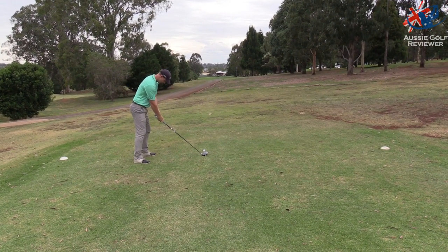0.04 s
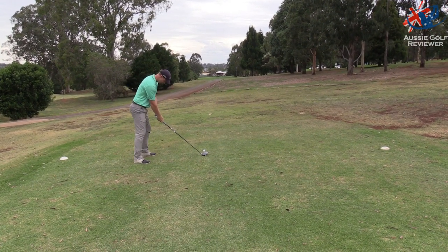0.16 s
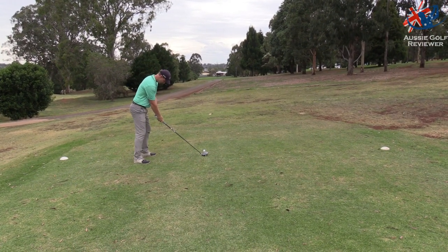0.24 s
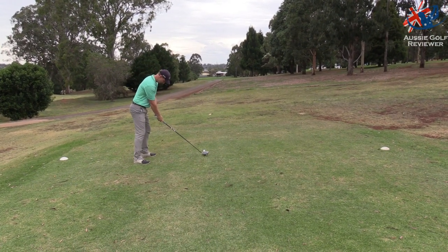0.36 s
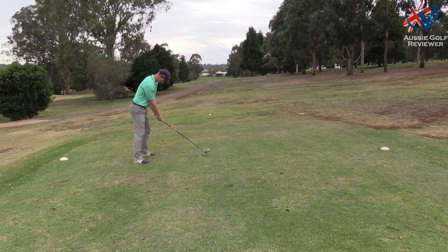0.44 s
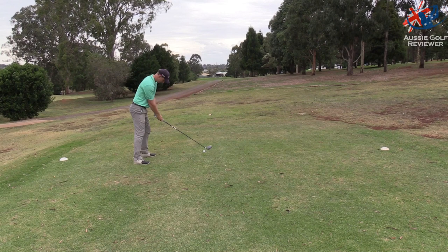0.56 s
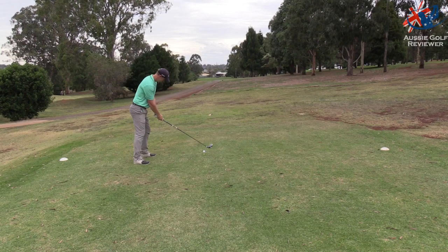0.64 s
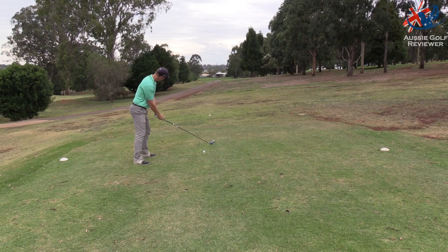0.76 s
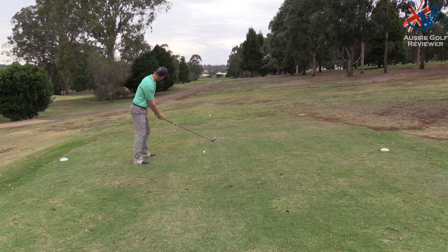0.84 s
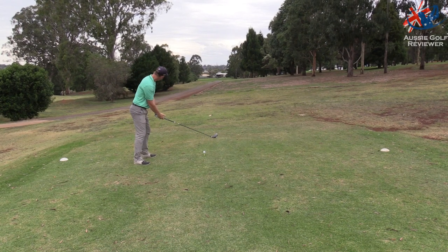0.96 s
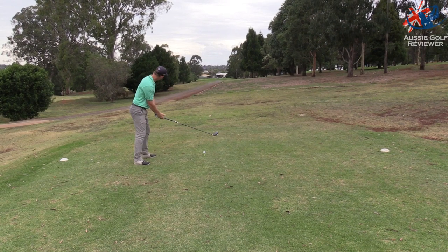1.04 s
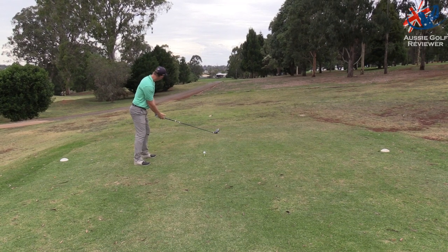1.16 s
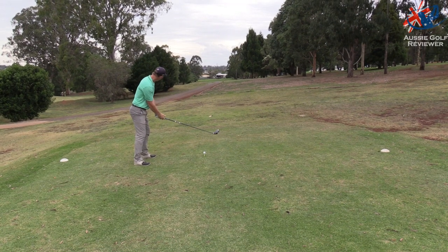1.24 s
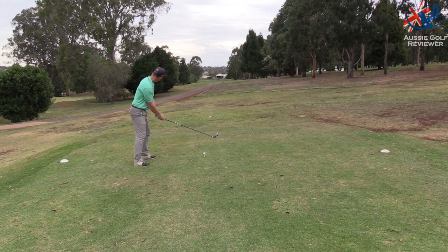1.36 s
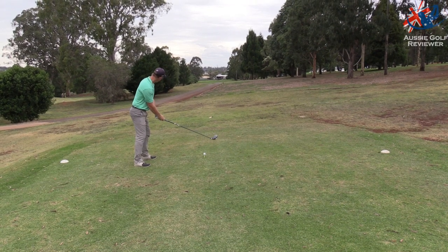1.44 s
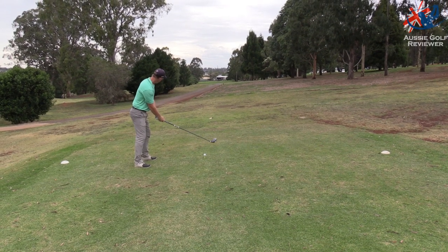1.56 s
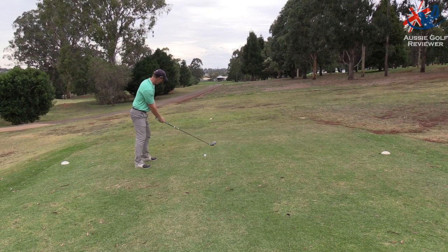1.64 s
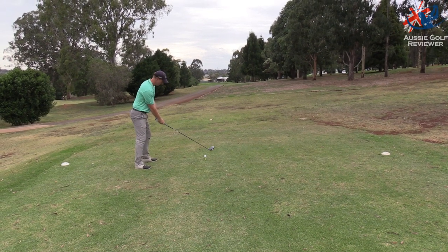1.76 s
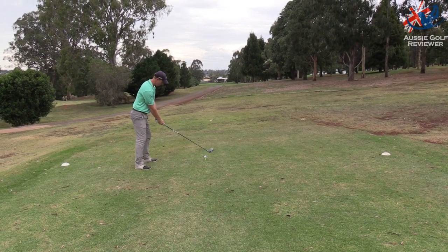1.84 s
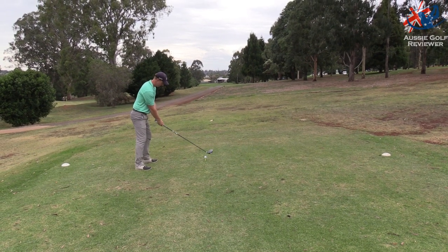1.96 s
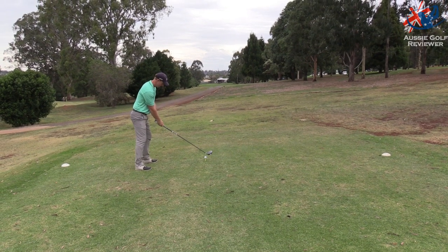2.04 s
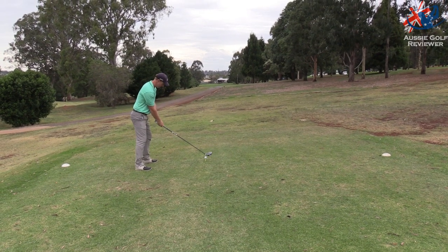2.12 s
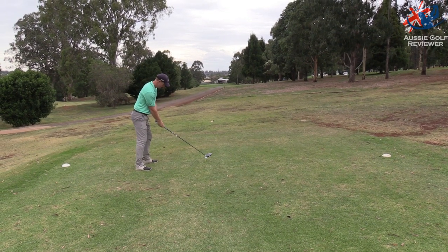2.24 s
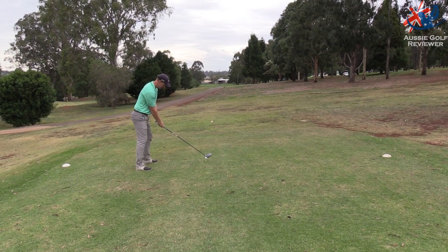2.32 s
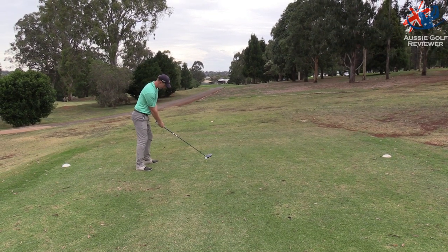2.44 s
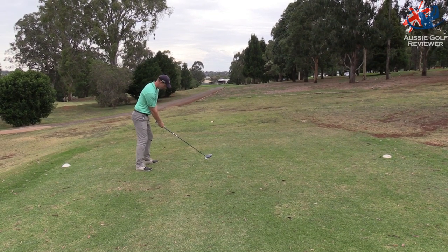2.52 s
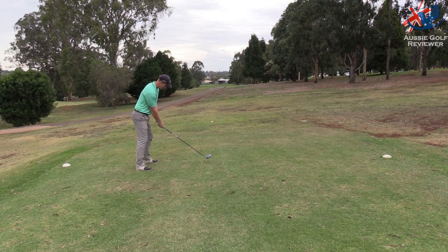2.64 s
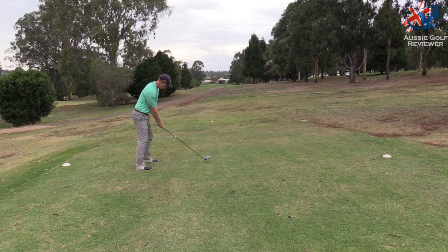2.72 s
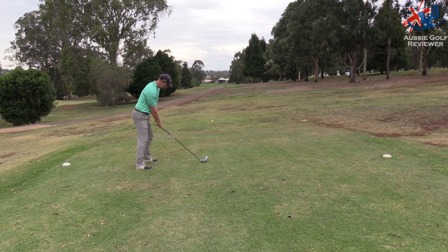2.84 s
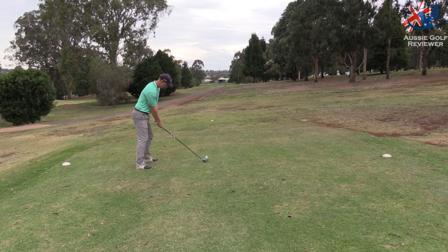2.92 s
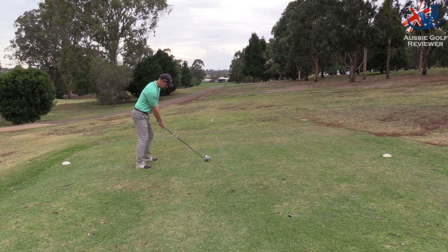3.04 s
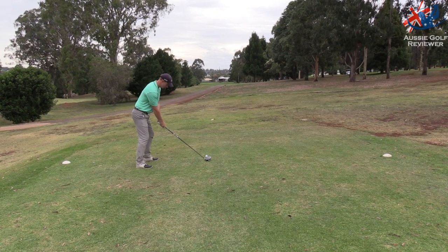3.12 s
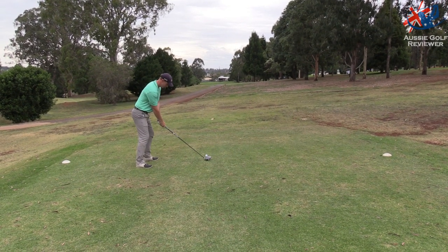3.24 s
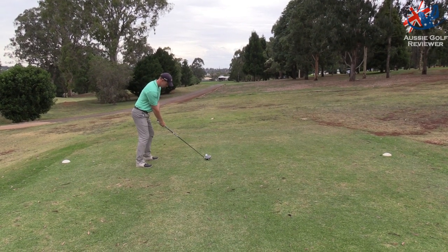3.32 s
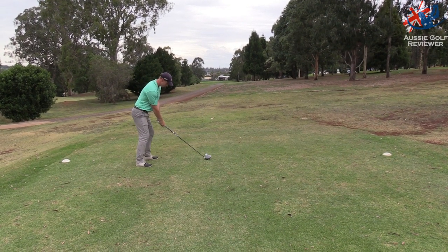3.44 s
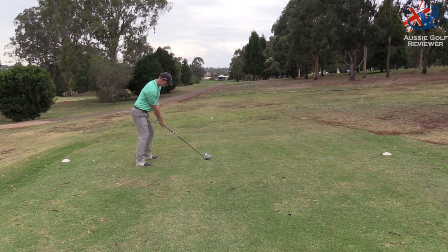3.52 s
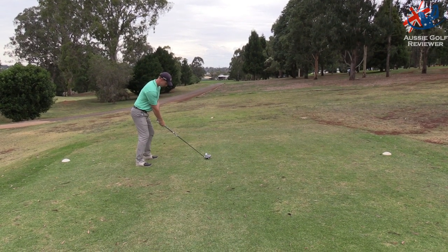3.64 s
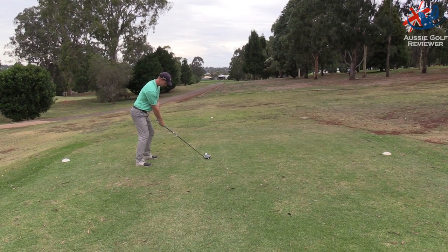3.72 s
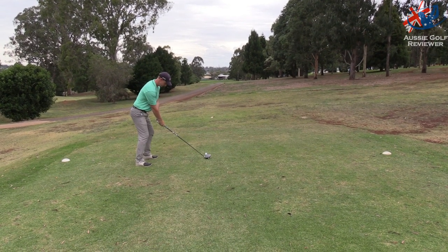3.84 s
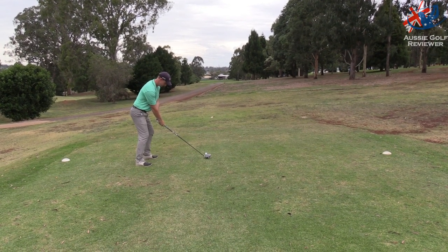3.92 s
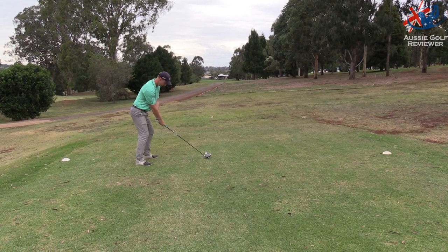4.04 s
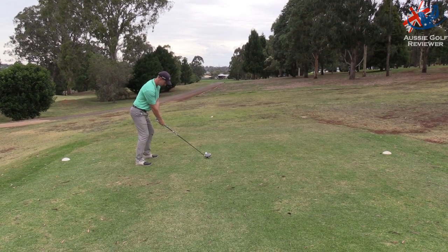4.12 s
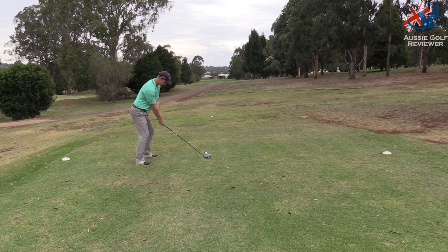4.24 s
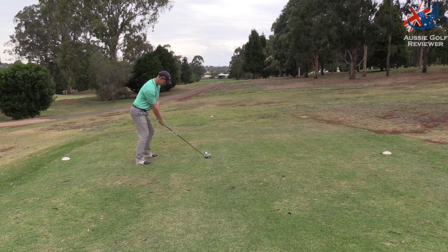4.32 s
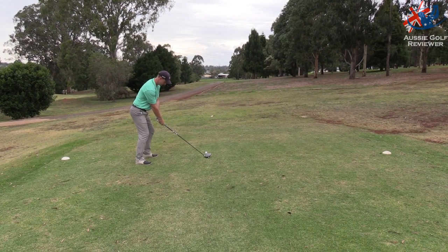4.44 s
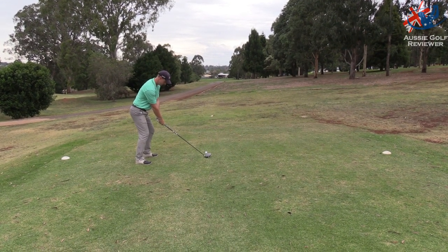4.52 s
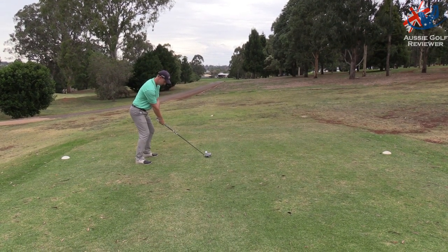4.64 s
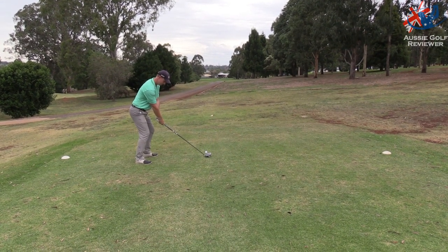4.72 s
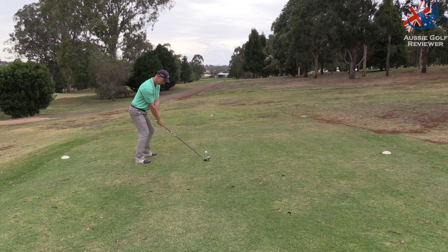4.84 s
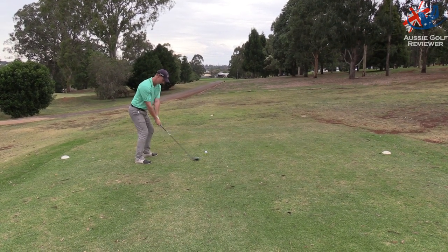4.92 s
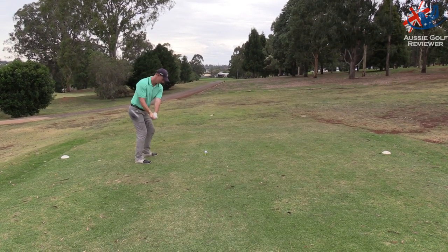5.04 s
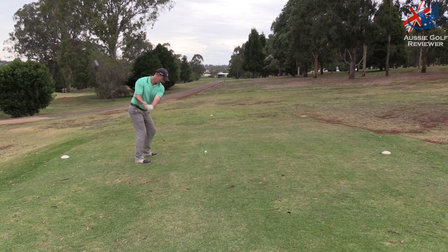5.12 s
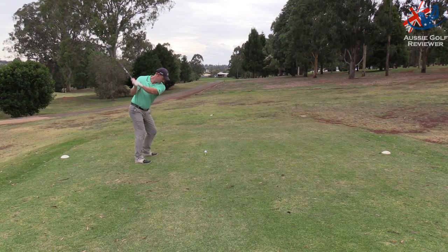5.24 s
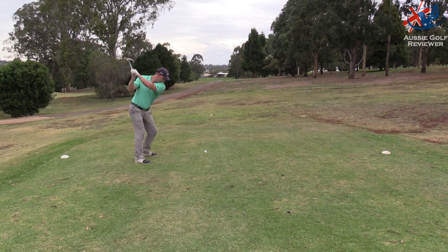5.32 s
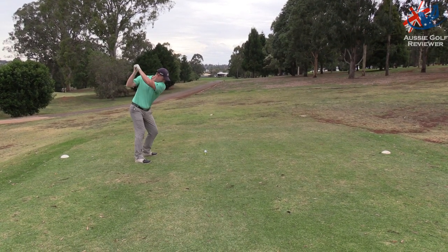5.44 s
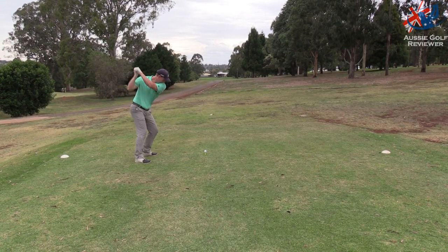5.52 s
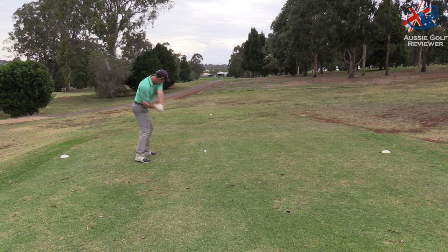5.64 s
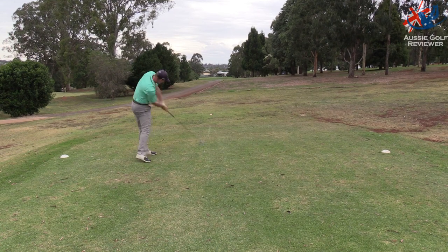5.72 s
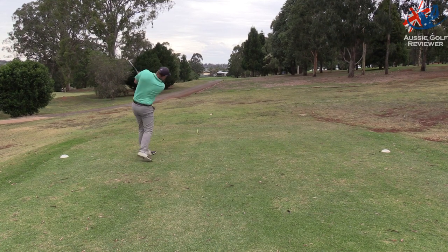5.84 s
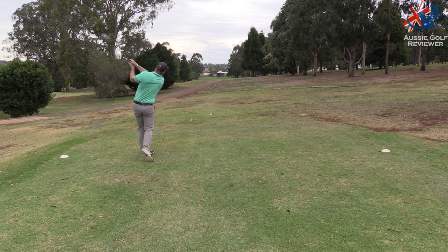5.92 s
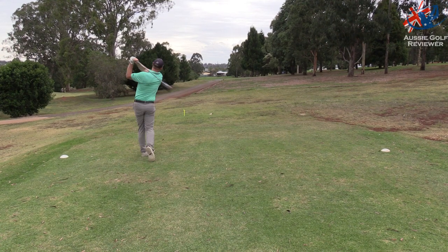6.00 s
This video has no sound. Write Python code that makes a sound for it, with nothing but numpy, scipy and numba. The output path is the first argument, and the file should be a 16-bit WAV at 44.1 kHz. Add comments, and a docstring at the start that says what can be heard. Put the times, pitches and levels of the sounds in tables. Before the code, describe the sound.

Quiet breezy outdoors with faint wind rumble, leaf hiss and distant bird chirps, then a quick swish and one loud, sharp metallic golf drive.

```python
"""Tee shot on a breezy tree-lined course

A driver strikes a ball a few metres from the microphone: band-passed noise makes the shaft's swish,
a pressure pulse, noise and decaying modes make the crack and ring, and turf and tree lines echo them.
Noise bands make wind and leaf hiss; gliding sines make small birds far off and one thin tone after
the strike. Short noise bursts tick close by."""
import sys
import numpy as np
from scipy import signal
from scipy.io import wavfile
from scipy.ndimage import uniform_filter1d, map_coordinates
from numba import njit

SR = 44100
rng = np.random.default_rng(int(sys.argv[2]) if len(sys.argv) > 2 else 0)


def to_wav(sig):
    """Store sig (one row per channel, or 1-D mono) as 16-bit WAV at the path in sys.argv[1].

    Samples outside -1..1 are clipped; the rate is SR.
    """
    pcm = np.clip(np.atleast_2d(sig), -1, 1) * 32767
    pcm = np.round(pcm).astype(np.int16)
    wavfile.write(sys.argv[1], SR, pcm.T)  # frames by channels


N = 267642


def undb(db):
    """Amplitude factor of a level in dB."""
    return 10 ** (np.asarray(db) / 20)


def unit(x):
    """The signal scaled to rms 1."""
    return x / np.sqrt(np.mean(x ** 2))


def curves(rows):
    """Columns of a table as signals over the whole scene; the first column is time."""
    s, *columns = np.transpose(rows)
    return [np.interp(np.arange(N) / SR, s, column) for column in columns]


def on_log(table, hz):
    """Level read from a spectrum table, straight between points on a log frequency axis."""
    table_hz, table_db = np.transpose(table)
    return np.interp(np.log(hz), np.log(table_hz), table_db)


@njit
def svf(x, hz, sharp):
    """State-variable band-pass with a moving centre, gain 1 there."""
    y, b, l = np.empty(len(x)), 0., 0.
    for i in range(len(x)):
        g = np.tan(np.pi * hz[i] / SR)
        v = (b + g * (x[i] - l)) / (1 + g * (g + 1 / sharp))
        b, l, y[i] = 2 * v - b, l + 2 * g * v, v / sharp
    return y


def band(hz, edge):
    """Noise between hz / edge and hz * edge, rms 1."""
    edges_hz = [hz / edge, min(hz * edge, .45 * SR)]
    sos = signal.butter(2, edges_hz, "band", fs=SR, output="sos")
    return unit(signal.sosfilt(sos, rng.standard_normal(N)))


def around(x, hz, span):
    """Gentle band-pass from hz / span to hz * span."""
    edges_hz = [hz / span, min(hz * span, .45 * SR)]
    return signal.sosfilt(signal.butter(1, edges_hz, "band", fs=SR, output="sos"), x)


def walk(rate):
    """Random levels held 1 / rate s and slewed twice; spread near 1."""
    hold = int(SR / rate)
    steps = np.repeat(rng.standard_normal(N // hold + 1), hold)
    return unit(uniform_filter1d(uniform_filter1d(steps, hold), hold)[:N])


def spread(mid, side):
    """Left and right channels from mid and side."""
    return np.array([mid + side, mid - side])


def add(out, s, sound):
    """Mix a sound in at time s."""
    i = int(s * SR)
    out[..., i:i + sound.shape[-1]] += sound[..., :N - i]


def texture(table, start_hz, count, moves_db):
    """Half-octave stereo noise bands sharing unit mid power; moves_db(hz) is each band's changing level."""
    # stereo width of the outdoor air: hz, side_minus_mid_db
    width = [(30, -17), (60, -13), (110, -21.5), (200, -8.5), (380, -15), (700, -13), (1290, -10),
             (2380, -7), (4400, -16), (8120, -16.5), (15000, 3)]
    centres_hz = start_hz * 2 ** (np.arange(count) / 2)
    # a wider band holds more power
    shares = undb(on_log(table, centres_hz)) * np.sqrt(centres_hz)
    shares /= np.linalg.norm(shares)
    out = np.zeros((2, N))
    for hz, share in zip(centres_hz, shares):
        side = undb(on_log(width, hz)) * band(hz, 1.25)
        out += share * undb(moves_db(hz)) * spread(band(hz, 1.2272), side)
    return out


def wind():
    """Turbulence on the capsule; stronger gusts reach higher, eddies thump."""
    # wind at the microphone: start_s, level_db
    gusts = [(0, -53), (.5, -57), (1.1, -51), (1.5, -54), (1.7, -57), (2.42, -57.5), (2.62, -50),
             (2.8, -53.5), (3.33, -51.5), (3.9, -54.5), (4.56, -51.5), (4.64, -44), (4.82, -46),
             (4.9, -48.5), (5.1, -49), (5.5, -50), (5.75, -45), (5.82, -44), (5.93, -46), (6.07, -46)]
    # buffeting spectrum: hz, relative_db_per_hz
    buffet = [(12, -42), (20, -16), (43, -13), (73, -1.5), (123, -3.5), (242, -11.5), (398, -18.5),
              (500, -22), (650, -53), (1100, -120)]
    # lone eddies that thump the capsule: start_s, peak_db, pitch_hz
    thumps = [(1.19, -47, 80.3), (1.93, -44, 99.4), (2.908, -39.5, 110.4), (3.51, -47, 80.5),
              (3.675, -47, 84.7), (4.333, -44.5, 142.5), (4.643, -41.5, 104), (4.674, -35.5, 132.7),
              (4.81, -31.5, 146), (5.156, -41, 327), (5.166, -36.5, 221), (5.174, -34.5, 101),
              (5.242, -38, 187), (5.349, -40.5, 110.4), (5.576, -32.5, 115.2), (5.662, -32.5, 118),
              (5.815, -37.5, 94.8), (5.924, -31.5, 118.3), (5.952, -34.5, 99), (5.979, -41, 152.7),
              (6.043, -46.5, 111)]
    gust_db, = curves(gusts)
    below_peak_db = gust_db - gust_db.max()

    def moves_db(hz):
        octaves_up = max(np.log2(hz / 130), 0)
        return gust_db + 0.75 * below_peak_db * octaves_up + 2.67 * walk(18)

    out = texture(buffet, 23.54, count=9, moves_db=moves_db)
    for s, db, hz in thumps:
        t = np.arange(int(2.48 * SR / hz)) / SR  # 2.48 cycles
        add(out, s, undb(db) * np.hanning(len(t)) * np.sin(2 * np.pi * hz * t))
    return out


def leaves():
    """Far foliage hiss that swells slowly and flickers a little."""
    # foliage spectrum: hz, relative_db_per_hz
    foliage = [(150, -0.5), (175, -3.5), (221, -8), (337, -9), (728, -7.5), (1000, -12), (1400, -15),
               (2000, -21), (2810, -22), (3890, -26), (5950, -26.5), (11700, -44.5), (15000, -71.5)]
    # rustle of the trees: start_s, level_db
    rustle = [(0, -60), (1.6, -61), (3.6, -61.5), (4.6, -60.5), (5.6, -60)]
    rustle_db, = curves(rustle)
    return texture(foliage, 169.5, count=14,
                   moves_db=lambda hz: rustle_db + 0.866 * walk(1.629) + 1.21 * walk(12))


def note(hz, db, octave_db):
    """One whistled note with a slight rasp; the octave leads, the low tone follows."""
    waver, rasp = .006, .38  # relative rms spread of pitch and of amplitude
    along = np.linspace(0, 1, len(hz))
    pitch = 1 + waver * unit(uniform_filter1d(rng.standard_normal(len(hz)), 150))
    roughness = 1 + rasp * unit(uniform_filter1d(rng.standard_normal(len(hz)), 120))
    phase = 2 * np.pi * np.cumsum(hz * pitch) / SR
    low = undb(db - 9.9 * (1 - along) ** 2) * np.sin(phase)
    octave = undb(octave_db - 6 * (1 - along) ** 4 - 4.4 * along ** 4) * np.sin(2 * phase)
    return roughness * signal.windows.tukey(len(hz), .25) * np.sqrt(2) * (low + octave)


def birds():
    """Chirps, peeps and a faint far twitter as gliding whistles, smeared by the trees."""
    # rising chirps: start_s, length_s, start_hz, end_hz, bend (over 1 steepens toward the end),
    # level_db, octave_db
    chirps = [(0.045, 0.0447, 2190, 3395, 1.96, -66, -67), (0.2, 0.0383, 2377, 3150, 0.95, -68.5, -75.5),
              (0.473, 0.016, 2352, 3290, 2.1, -67, -81.5), (0.587, 0.0528, 2000, 3118, 2, -68.5, -69.5),
              (1.118, 0.0224, 2900, 3198, 1.2, -69, -78.5), (1.193, 0.05, 2239, 3350, 1.13, -70, -71),
              (1.789, 0.0305, 2295, 3326, 1.25, -68, -70.5), (2.392, 0.0388, 2108, 3130, 1.65, -67, -67.5),
              (3.006, 0.036, 2130, 3008, 1.37, -68, -70), (3.042, 0.0238, 4100, 4636, 0.56, -67.5, -88),
              (3.511, 0.0524, 2100, 3100, 1.5, -66.5, -69.5), (3.96, 0.04, 2168, 3153, 1.73, -73.5, -85),
              (3.875, 0.065, 3930, 4080, 1.5, -72, -95), (4.35, 0.036, 2700, 3640, 1.2, -67.5, -87.5),
              (4.438, 0.044, 2315, 3430, 1.58, -67.5, -75), (4.798, 0.046, 2450, 3942, 1.11, -65.5, -79),
              (5.205, 0.045, 2900, 3950, 0.798, -64, -76), (5.208, 0.0285, 2285, 2825, 1.28, -68, -68.5)]
    # short, slightly rising peeps of other birds: start_s, level_db, pitch_hz
    peeps = [(0.062, -66, 4450), (.088, -67.5, 4150), (0.095, -68, 4720), (.113, -69, 4750),
             (0.132, -67, 3720), (.148, -74, 2943), (.165, -79.5, 5450), (0.225, -65.5, 3900),
             (0.505, -63, 4220), (.632, -68.5, 4100), (.635, -70.5, 5400), (0.652, -67.5, 3520),
             (.658, -73, 2011), (.66, -73.5, 3250), (1.017, -75, 4600), (1.035, -72.5, 3750),
             (1.056, -77, 3800), (1.088, -74.5, 4400), (1.139, -71, 4520), (1.16, -72, 4576),
             (1.176, -74, 4370), (1.215, -71.5, 5516), (1.264, -71, 4353), (1.794, -66, 4730),
             (2.158, -66.5, 6066), (1.53, -72, 3530), (1.58, -73, 3247), (1.97, -79.5, 4160),
             (2.1, -74.5, 5920), (2.2, -74, 5860), (2.35, -68, 2704), (2.361, -67.5, 4700),
             (2.422, -71, 3760), (3.063, -71, 3480), (3.42, -70.5, 3266), (3.474, -75.5, 5000),
             (3.51, -70, 2700), (3.545, -77, 2596), (4.069, -65.5, 4742), (4.825, -70, 5910),
             (4.845, -69, 4730), (4.865, -75.5, 4920), (4.887, -71, 4310), (4.95, -71.5, 4500),
             (5.04, -71, 4560), (5.06, -71, 5580), (5.188, -69.5, 3560), (5.23, -64.5, 3822)]
    # far flock chatter: start_s, level_db
    twitter = [(0, -80), (.7, -81), (1.3, -82), (2.2, -85), (3.2, -84), (3.7, -81.5), (4.3, -82.5),
               (4.9, -79.5), (5.25, -81), (5.5, -87)]
    # flock's pitch range: low_hz, high_hz
    twitter_range = (2690, 5580)
    peep_s, peep_octave_db = 0.0191, -27.5
    echo_s, echo_db = 0.021, -10  # one trunk's echo

    out = np.zeros(N)
    for s, length, start_hz, end_hz, bend, db, octave_db in chirps:
        along = np.linspace(0, 1, int(length * SR))
        add(out, s, note(start_hz + (end_hz - start_hz) * along ** bend, db, octave_db))
    for s, db, hz in peeps:
        glide_hz = hz * np.linspace(.98, 1.03, int(peep_s * SR))
        add(out, s, note(glide_hz, db, db + peep_octave_db))
    for when, pitch, glide, size, loud in rng.random((480, 5)):
        length = int((0.011 + 0.023 * size) * SR)
        hz = np.interp(pitch, [0, 1], twitter_range) * np.linspace(1, .95 + 0.1529 * glide, length)
        db = np.interp(when * N / SR, *np.transpose(twitter)) + 3.5 * loud ** 3
        add(out, when * (N - 1) / SR, note(hz, db, db + peep_octave_db))

    t = np.arange(int(.25 * SR)) / SR
    # a separate noise tail for each channel, falling 60 dB in 0.156 s
    tails = [undb(-36.5 - 60 * t / 0.156) * rng.standard_normal(len(t)) for _ in range(2)]
    smear = signal.fftconvolve(out[None], tails, axes=1)[:, :N]
    echo = undb(echo_db) * np.roll(out, int(echo_s * SR))
    return spread(out + echo, 0.056 * out + 0.15 * echo) + smear


def ticks():
    """Short dry ticks close by: decaying noise bursts through gentle band-passes."""
    # faint ticks: start_s, peak_db, centre_hz
    tick_rows = [(0.432, -53.5, 4200), (0.4731, -55, 3400), (0.6307, -50.5, 4500), (0.658, -52.5, 3640),
                 (1.688, -57.5, 4190), (1.7617, -56, 3030), (1.923, -62.5, 5610), (2.0474, -61.5, 4330),
                 (2.17, -55.5, 5840), (4.4735, -55.5, 3370)]
    out, t = np.zeros(N), np.arange(600) / SR
    low_pass = signal.butter(3, 11000, fs=SR, output="sos")
    for s, db, hz in tick_rows:
        burst = np.exp(-t / 0.0044) * rng.standard_normal(len(t))
        burst = around(around(burst, hz, 1.525), 4600, 2.07)
        burst = signal.sosfilt(low_pass, burst)
        add(out, s, undb(db) * burst / np.abs(burst).max())
    return out


def thin_tone():
    """A faint sine just after the strike that swells, then falls in pitch as it fades."""
    start_s, hold_s, drop_s = 5.842, .055, .025
    hold_hz, end_hz = 1560, 1330
    start_db, full_db = -62, -57
    t = np.arange(int((hold_s + drop_s) * SR)) / SR
    drop = np.clip((t - hold_s) / drop_s, 0, 1)
    hz = hold_hz + (end_hz - hold_hz) * drop ** 2
    swell = undb(np.interp(t, [0, hold_s], [start_db, full_db]))
    fade = np.clip(t / 0.0081, 0, 1) * (1 - drop ** 4)
    out = np.zeros(N)
    add(out, start_s, swell * fade * np.sin(2 * np.pi * np.cumsum(hz) / SR))
    return out


def swing():
    """Vortices off the shaft whistle higher as it speeds up, lower after the strike; the head hisses."""
    # swish through the swing, rising to the strike, then falling:
    # start_s, shaft_whistle_hz, whistle_db, head_hiss_db
    swish = [(5.64, 585, -65, -100.5), (5.708, 720, -60, -70), (5.712, 757, -52.5, -57),
             (5.732, 850, -47, -57), (5.745, 866, -46.5, -52), (5.76, 1000, -47, -60),
             (5.775, 1030, -43, -39), (5.8, 920, -55.5, -57), (5.83, 807, -52.5, -76.5)]
    t = np.arange(N) / SR
    hz, whistle_db, hiss_db = curves(swish)
    whistle = unit(svf(rng.standard_normal(N), hz, 6.5))
    whistle += undb(-13.5) * unit(svf(rng.standard_normal(N), 2.006 * hz, 11.0))  # near the octave
    hiss = band(3760.0, 1.25) + undb(1.0) * band(3920.0, 1.52)
    during = (t > swish[0][0]) * (t < swish[-1][0])
    mid = (undb(whistle_db) * whistle + undb(hiss_db) * hiss) * during
    return spread(mid, 0.095 * np.roll(mid, 40))


def strike():
    """The squashed ball pushes the air once, the face cracks, the hollow metal head rings."""
    # club head modes: pitch_hz, level_db, t60_s
    modes = [(382, -11, 0.00848), (658, -22, 0.0156), (1283, -27, 0.024), (1799, -23, 0.0206),
             (2735, -27.5, 0.041), (3026, -19.5, 0.029), (3425, -16.5, 0.0407), (3585, -26, 0.0776),
             (4292, -11, 0.0192), (4358, -19.5, 0.029), (4550, -17, 0.0214), (4901, -17, 0.033),
             (5190, -32.5, 0.021), (5396, -14.5, 0.0296), (5481, -15, 0.034), (6040, -19.5, 0.0155),
             (6814, -22, 0.0328), (9610, -26, 0.0156), (9915, -30.5, 0.0155), (11240, -27, 0.024),
             (13700, -33.5, .015)]
    push_s, push_db, crack_db = 0.000448, -4, -17.5
    t = np.arange(int(.12 * SR)) / SR
    push = -undb(push_db) * np.sin(np.pi * np.clip(t / push_s, 0, 1)) ** 2
    # the face springs back as the ball leaves, which starts every mode
    after = np.clip(t - 0.699 * push_s, 0, None)
    ring = np.zeros(len(t))
    for hz, db, t60 in modes:
        ring += undb(db) * np.exp(-np.log(1000) * after / t60) * np.sin(2 * np.pi * hz * after)
    crack_shape = undb(crack_db) * np.exp(-after / 0.00437) * (after > 0)
    return push + ring + crack_shape * band(5230.0, 1.687)[:len(t)]


def doppler(x, ratio):
    """The same sound played at ratio times the speed, so its pitch shifts by that ratio."""
    return map_coordinates(x, [np.arange(len(x)) * ratio], order=3)


def echoes(hit):
    """The strike direct, off near surfaces, then smeared by many leaves and trunks."""
    # near reflections; the head runs toward some surfaces, which hear it higher:
    # delay_s, level_db, pitch_ratio, left_minus_right_db
    near = [(.0026, -11.5, 1.02, 7), (.0054, -15, 0.9, 9), (0.0144, -10.5, 1.25, -4.5),
            (.0575, -35.5, 1, 6)]
    # scattering by turf and tree lines; leaves return treble, trunks the middle:
    # delay_s, rise_s, level_db, t60_s, pitch_ratio, centre_hz, band_edge_ratio
    trees = [(0.002, 0.000995, -49.5, 0.094, 1.2, 6100, 2.1), (.0145, .001, -37, 0.0334, 1.05, 3400, 2.75),
             (.056, 0.0014, -47, 0.191, 1.16, 6700, 1.97), (.062, 0.022, -46, 0.132, 1.145, 3900, 1.06),
             (0.059, 0.0137, -56, 0.316, 1.05, 1340, 4.78), (0.174, 0.0047, -58, 0.505, 1.085, 5700, 1.25),
             (.176, 0.0104, -61, 0.396, 1.2, 8900, 1.36), (0.19, .001, -59, 0.0264, 0.99, 1670, 2.5),
             (0.16, 0.0276, -55.5, 0.6, 1.12, 3780, 1.11), (.18, 0.0263, -56.5, 0.604, 1.05, 870, 3.37),
             (0.027, 0.035, -63.5, 0.8, 1.25, 8300, 1.24), (.18, 0.011, -55.5, 0.32, 1.16, 7830, 1.05),
             (0.013, .006, -67.5, 0.54, 1.4, 2830, 2.15)]
    strike_s = 5.77485
    near_trees_s = .1  # trees answering sooner stand to the sides
    near_width, far_width = 0.214, 0.074  # side share of near and far echoes

    out = np.zeros((2, N))
    add(out, strike_s, spread(hit, 0.068 * (np.roll(hit, 4) - np.roll(hit, 10))))
    for delay, db, ratio, pan_db in near:
        # rough surfaces lose the thud
        back = around(doppler(hit, ratio), 5370, 2.13)
        add(out, strike_s + delay, back * undb(db + np.array([[pan_db], [-pan_db]]) / 2))

    t = np.arange(int(.3 * SR)) / SR
    for delay, rise, db, t60, ratio, hz, edge in trees:
        shape = np.clip(t / rise, 0, 1) * undb(db - 60 * np.clip(t - rise, 0, None) / t60)
        width = near_width if delay < near_trees_s else far_width
        # trunks stand at many angles to the swing, each with its own shift
        for shift in (-.022, 0, .014):
            side = width * rng.standard_normal(len(t))
            scatter = shape * spread(rng.standard_normal(len(t)), side)
            back = around(around(doppler(hit, ratio + shift), hz, edge), hz, edge)
            smeared = signal.fftconvolve(scatter, back[None], axes=1)
            add(out, strike_s + delay, smeared / np.sqrt(3))
    return out


def scene():
    """The course around the tee, then the shot."""
    background = wind() + leaves() + birds() + ticks()
    return background + thin_tone() + swing() + echoes(strike())


def record(dry):
    """The converter clips peaks beyond 0.93, then a steep low-pass cuts the top."""
    top_hz = 15700
    low_pass = signal.ellip(12, .3, 95, top_hz, fs=SR, output="sos")  # 0.3 dB ripple, 95 dB stop
    return signal.sosfilt(low_pass, np.clip(dry, -.93, .93))


dry = scene()
out = record(dry)
to_wav(out)
```